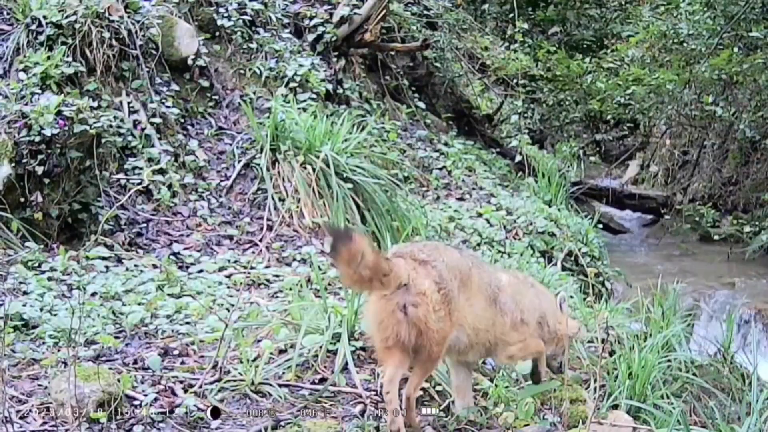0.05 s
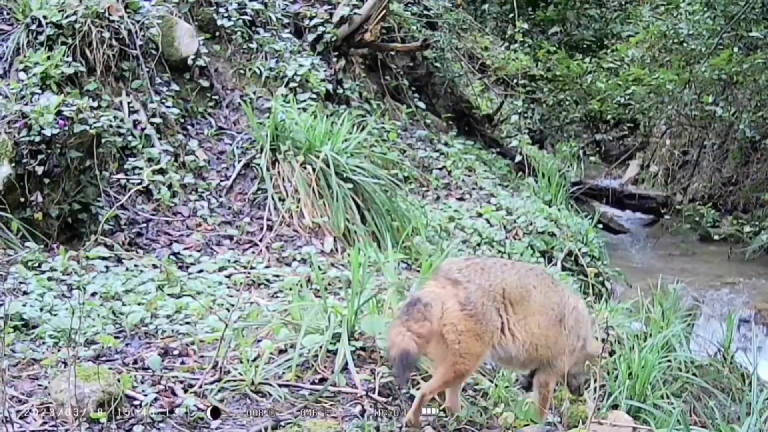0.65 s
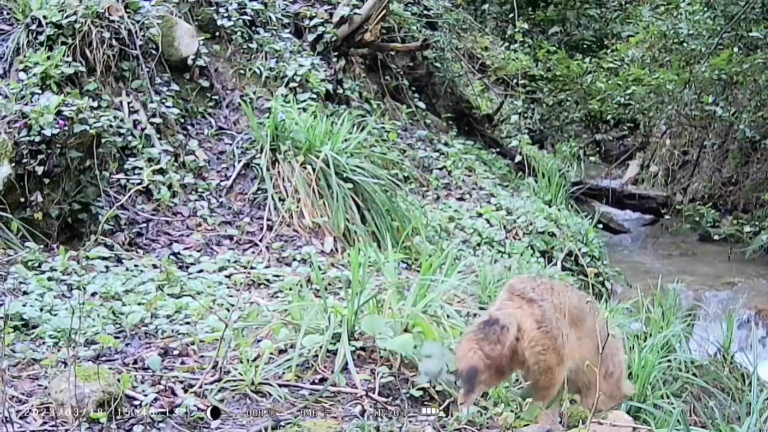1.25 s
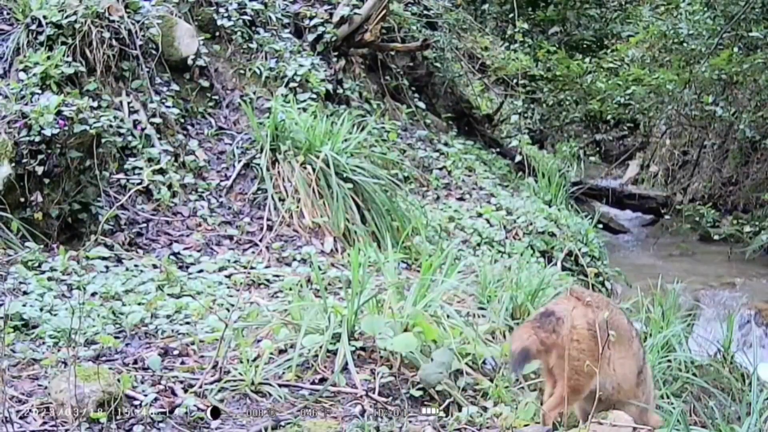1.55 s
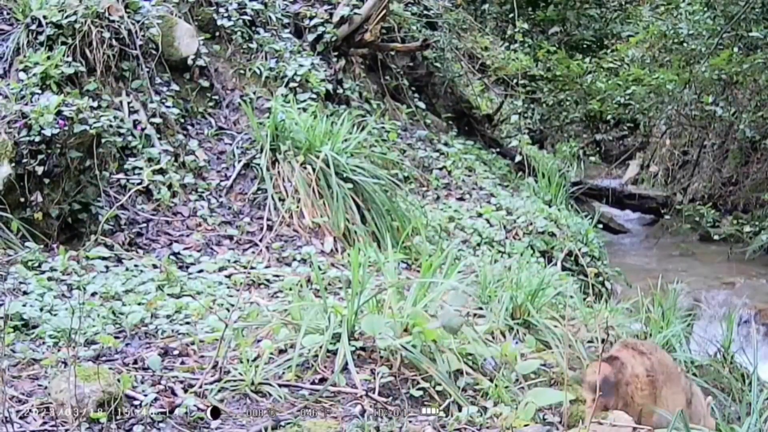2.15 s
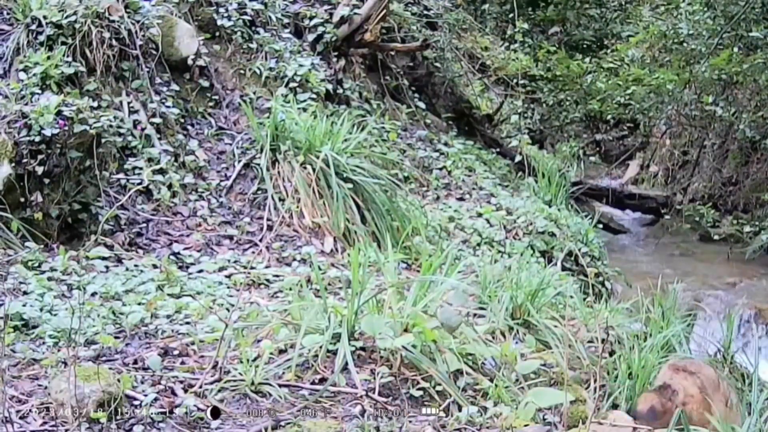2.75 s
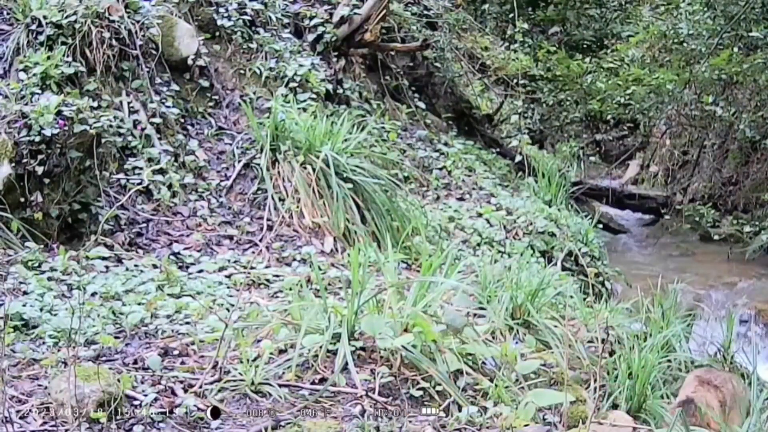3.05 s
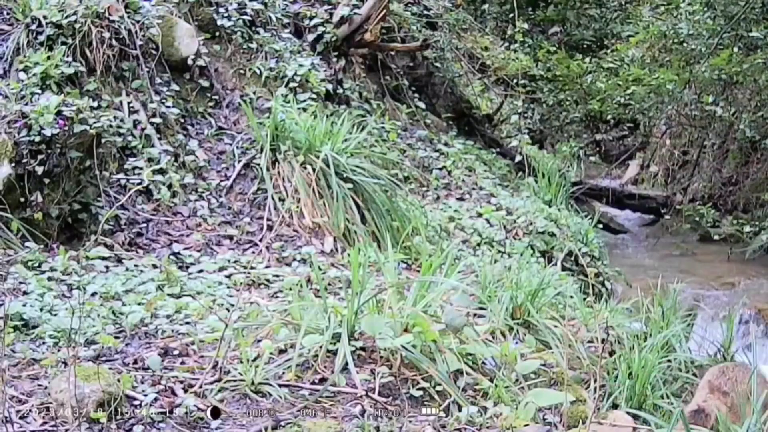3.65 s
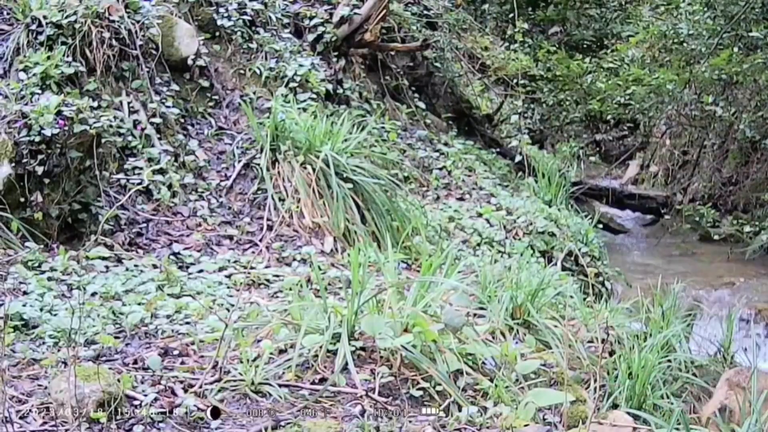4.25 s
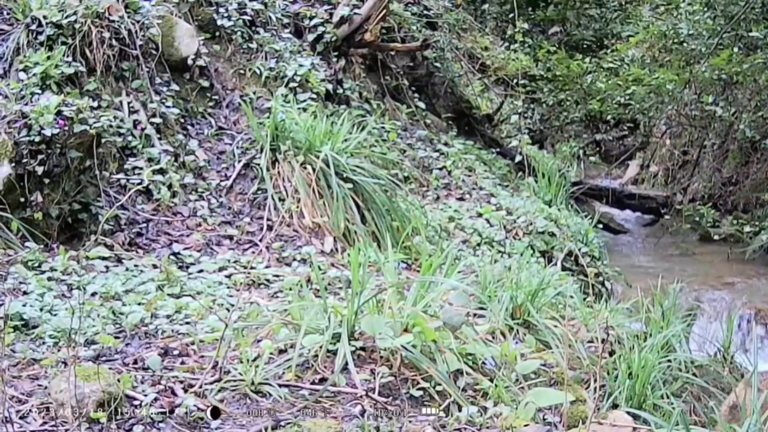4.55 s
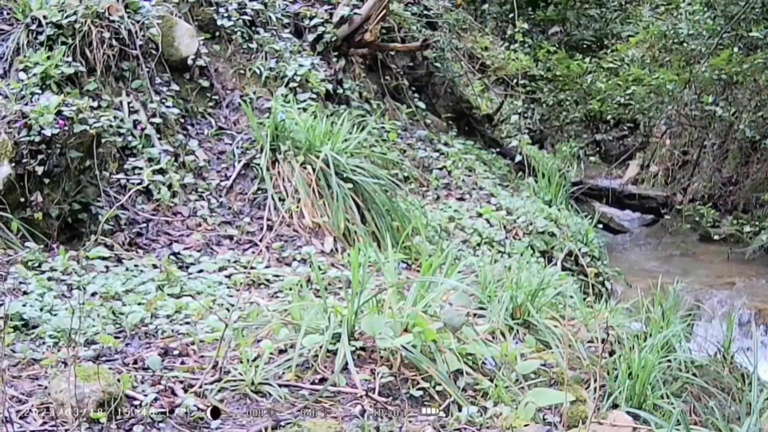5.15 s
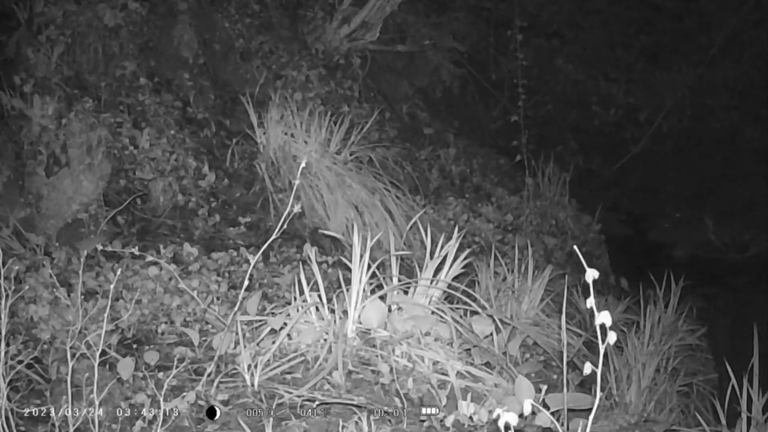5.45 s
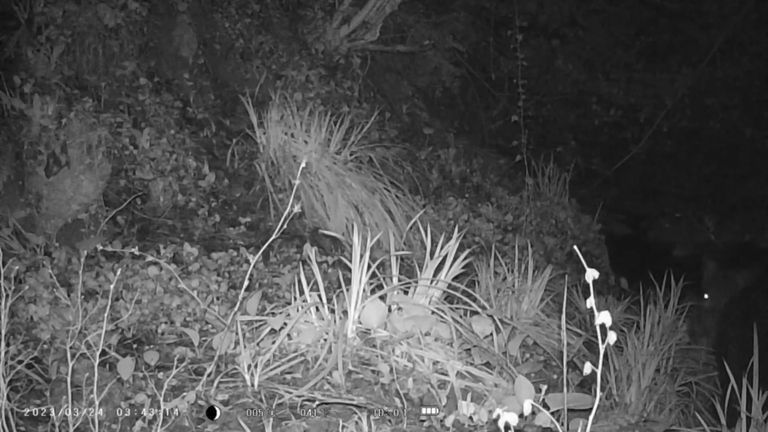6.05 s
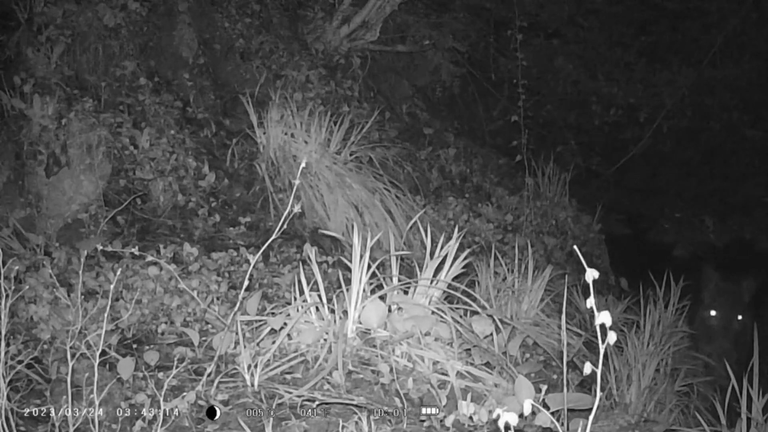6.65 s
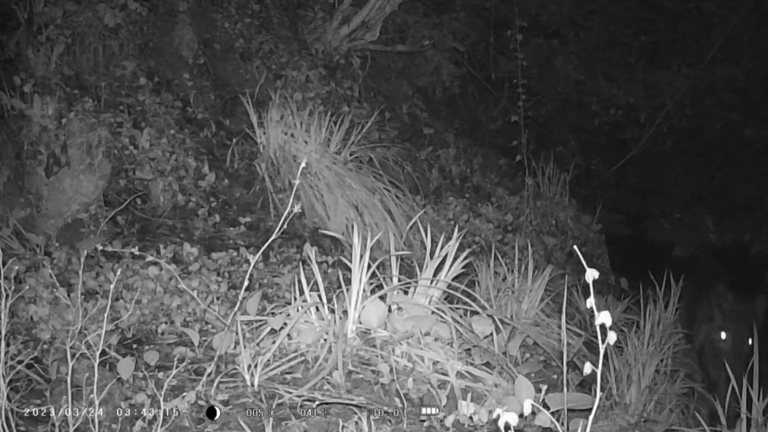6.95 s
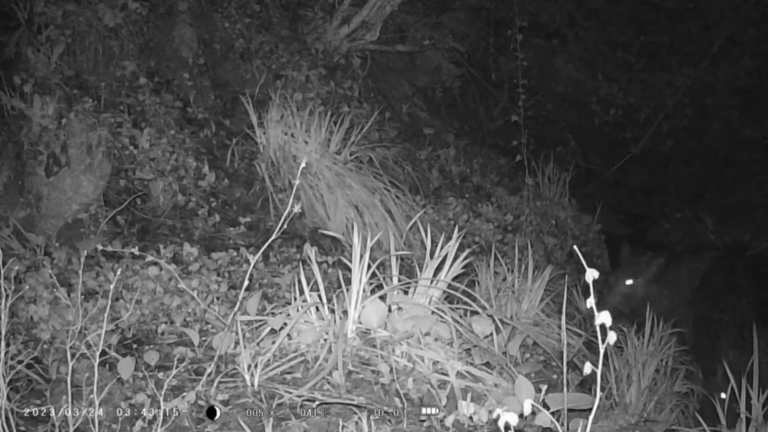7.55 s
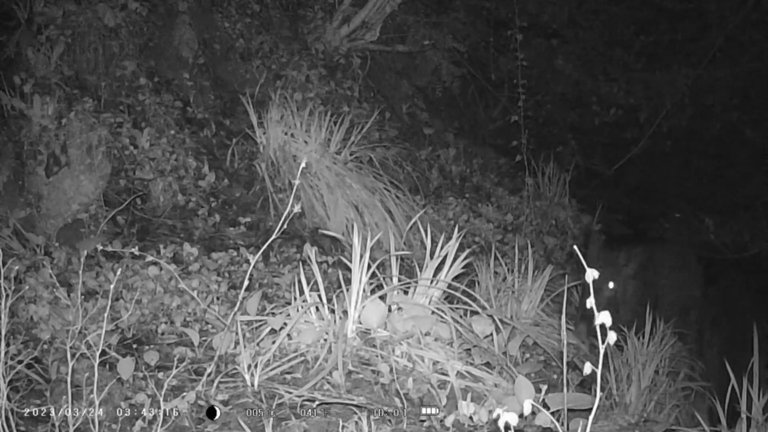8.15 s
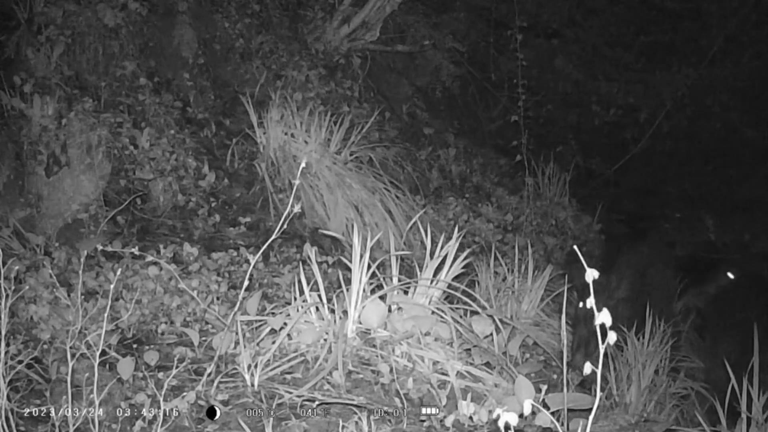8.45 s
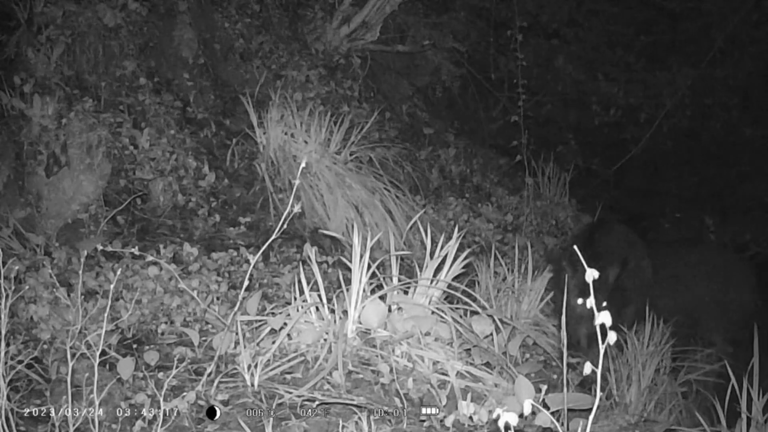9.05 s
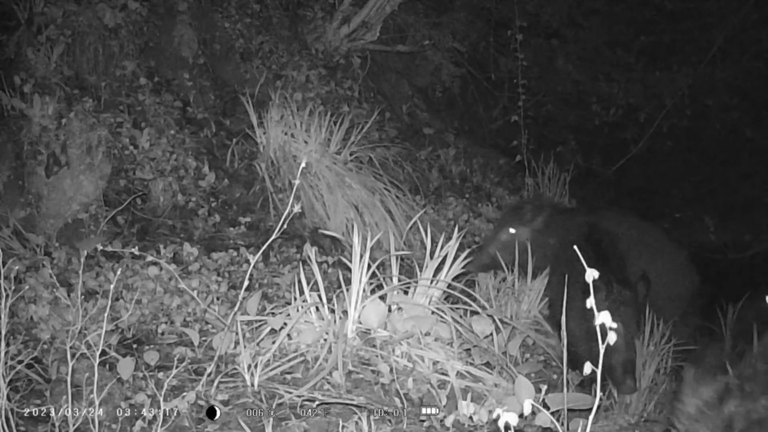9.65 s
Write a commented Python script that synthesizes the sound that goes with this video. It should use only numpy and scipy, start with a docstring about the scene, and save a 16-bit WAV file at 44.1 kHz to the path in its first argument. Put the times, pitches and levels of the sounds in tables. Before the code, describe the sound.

Steady hissing rush of a woodland stream, with one short dropout, then light leaf crackles, twig snaps and two faint low buzzes.

```python
"""A small woodland stream rushes, by day and then, after a short silence, by night.
Countless splashes make its rush, bubbles ring in it and spray fizzes on top.
An animal steps through leaf litter on the bank: leaves crackle under each paw, and dry stalks
and a few twigs snap as their fibres part and set the wood ringing.
A faint low buzz comes twice in the night."""
import sys
import numpy as np
from scipy import signal
from scipy.io import wavfile
from scipy.ndimage import uniform_filter1d

SR = 44100
rng = np.random.default_rng(int(sys.argv[2]) if len(sys.argv) > 2 else 0)


def file_out(sig):
    """Save sig as 16-bit WAV at sys.argv[1]."""
    # one column per channel
    cols = np.atleast_2d(sig).T
    # limit, then scale
    lim = np.clip(cols, -1, 1)
    pcm = np.round(lim * 32767).astype(np.int16)
    wavfile.write(sys.argv[1], SR, pcm)


N = 431738

# Rush spectrum: f/Hz, relative density/dB
RUSH_SPECTRUM = [(25, 0.5), (112, -6.5), (148, 4), (215, 0), (400, -2.5), (530, -9.5), (690, -2), (970, -6),
                 (1200, -9.5), (1850, -8), (2800, -12), (3900, -11)]
# Spray spectrum: f/Hz, relative density/dB
FIZZ_SPECTRUM = [(2900, -27), (3150, -6.5), (3900, -5), (4700, -2), (5900, 1), (6800, -1), (7500, -5),
                 (7800, -9.5), (8300, -15.5), (8900, -30)]
# Water levels: t/s, rush/dB, fizz/dB, rush midrange gain/dB
WATER_LEVELS = [(0, -40.5, -44.5, -0.5), (5.15, -40.5, -45.5, -1), (5.23, -41.5, -47.5, -1.5),
                (9.79, -42, -47.5, -1)]
def stream(rush_top_hz=4300, fizz_bottom_hz=2900):
    """The rush of a small fall, its bubbles and the fizz of its spray."""
    def rush_shape_db(hz):
        return at_hz(RUSH_SPECTRUM, hz) - 10 * np.log10(1 + (hz / rush_top_hz) ** 16)

    def fizz_shape_db(hz):
        octaves_below = np.maximum(np.log2(fizz_bottom_hz / (hz + 1)), 0)
        return at_hz(FIZZ_SPECTRUM, hz) - 24 * octaves_below

    rush_db, fizz_db, mid_db = per_sample(WATER_LEVELS)
    rush = water_noise(rush_shape_db, patch_db=1.09, flicker_db=.48)
    rush += (gain_of(mid_db) - 1) * band(rush, 230, 580, order=1)
    gurgle = woodland_echo(bubbles(), wet_db=-4, t60_s=.2)
    fizz = water_noise(fizz_shape_db, patch_db=2, flicker_db=.9)
    return gain_of(rush_db) * (rush + gain_of(-15.5) * gurgle) + gain_of(fizz_db) * fizz


# The hiss is wide above 4 kHz: f/Hz, left-right correlation
HISS_CORRELATION = [(4100, 1), (4280, 0.72), (8200, 0.18), (8450, 0.91)]
def water_noise(shape_db, patch_db, flicker_db):
    """Countless small splashes: noise in drifting patches, with a flicker shared by all pitches."""
    frames, hz = N // 256 + 5, np.fft.rfftfreq(1024, 1 / SR)
    a, b, c, d, patches = rng.standard_normal((5, frames, len(hz)))
    patches = uniform_filter1d(patches, size=9, axis=0)
    patches = unit_rms(uniform_filter1d(patches, size=10, axis=1))
    flicker = unit_rms(uniform_filter1d(rng.standard_normal(frames), size=7))[:, None]
    correlation = at_hz(HISS_CORRELATION, hz)
    left = a + 1j * b
    right = correlation * left + np.sqrt(1 - correlation ** 2) * (c + 1j * d)
    spectra = np.array([left, right]) * gain_of(shape_db(hz) + patch_db * patches + flicker_db * flicker)
    _, noise = signal.istft(spectra.transpose(0, 2, 1), nperseg=1024, noverlap=768)
    return unit_rms(noise[:, :N])


def bubbles(per_s=300, lo_hz=746.6, hi_hz=3840, decay_cycles=6.2, spread_db=4.5, sizes=36):
    """Each bubble rings for a few cycles and rises in pitch as it nears the surface."""
    out = np.zeros(N)
    for hz in np.geomspace(lo_hz, hi_hz, sizes):
        age = np.arange(0, 5, hz / (decay_cycles * SR))  # in decay times
        phase = 2 * np.pi * decay_cycles * age * (1 + .02 * age)
        ring = np.sin(phase) * np.exp(-age) * (1 - np.exp(-8 * age))
        onset, chance = rng.random((2, int(per_s * N / SR / sizes)))
        level_db = spread_db * np.minimum(-np.log(1 - chance), 4)
        births = np.bincount((onset * N).astype(int), gain_of(level_db), N)
        out += signal.oaconvolve(births, ring)[:N]
    return unit_rms(out)


# Paw steps: t/s at full weight, length/s, level/dB
PAW_STEPS = [(.578, 0.093, -49), (2.009, 0.072, -49), (2.08, .1, -50.5), (5.5, 0.25, -49.5),
             (6.375, 0.073, -50.5), (6.608, 0.44, -46.5), (6.772, .12, -50), (6.902, .12, -51),
             (7.417, .14, -50), (7.598, 0.18, -46.5), (8.075, 0.11, -45.5), (8.322, .1, -48),
             (8.666, 0.066, -42), (8.802, .06, -46), (8.9, .1, -45.5), (9.095, .07, -47), (9.191, .17, -50),
             (9.439, .14, -54)]
def leaves(cracks_per_s=2000, spread_db=3, rustle_db=-63, press_share=.53, step_edge_db=-9.5):
    """Dead leaves give way in tiny cracks, swelling as each paw presses down and fading as it lifts."""
    t = np.arange(N) / SR
    power = np.full(N, gain_of(rustle_db) ** 2)
    for peak_s, length_s, db in PAW_STEPS:
        from_peak = np.maximum((peak_s - t) / press_share, (t - peak_s) / (1 - press_share)) / length_s
        power += gain_of(db + step_edge_db * np.minimum(from_peak, 10)) ** 2
    cracks = rng.choice([-1, 1], N) * gain_of(spread_db * np.minimum(rng.exponential(1, N), 4))
    cracks *= rng.random(N) < cracks_per_s / SR
    crackle = unit_rms(band(cracks, 4850, 7150, order=3)) * np.sqrt(power)
    stereo = np.array([woodland_echo(crackle, wet_db=-12.5, t60_s=.12) for ear in range(2)])
    return band(stereo, 3600, 12000, order=8)


# Dry wood modes at pitch factor 1: f/Hz, relative level/dB, t60/s
WOOD_MODES = [(2270, 7.5, 0.0072), (4380, 2.5, .011), (5140, 1, .007), (5950, 3, 0.013), (6650, -5, 0.0068)]
def wood_snap(pitch, tear_s, bass_edge_hz, ring_db=-23, first_fibre_db=8):
    """Fibres part in a quick run of cracks that rings the wood; thin wood radiates little bass."""
    t = np.arange(2048) / SR
    response = gain_of(ring_db) * sum(
        gain_of(db - 60 * t / t60_s) * np.cos(2 * np.pi * hz * pitch * t) for hz, db, t60_s in WOOD_MODES)
    response[0] += 1  # the crack itself
    fibres = rng.choice([-1, 1], len(t)) * (rng.random(len(t)) < .25) * np.exp(-(t / tear_s) ** 2)
    fibres[0] = gain_of(first_fibre_db)
    snap = band(signal.fftconvolve(fibres, response)[:len(t)], bass_edge_hz, 11000, order=1)
    snap = band(snap, 1550, 7700 * pitch ** .15, order=6)
    tear_rms = np.sqrt(np.sum(snap ** 2) / (tear_s * SR))
    return snap / tear_rms


# Twig breaks: t/s, level/dB, pitch factor, tear length/s
TWIG_SNAPS = [(6.443, -24, 1.3, .0019), (8.3242, -26.5, 1.23, 0.0025), (9.017, -24, 0.94, .00086),
              (9.0311, -16, 1, 0.0029), (9.278, -28, 1, 0.0019), (9.7137, -30.5, .8, 0.0014)]
def twigs_and_stalks(stalk_over_leaves_db=6.5):
    """A few twigs break, the thin ones ringing higher; each step breaks a stalk at full weight."""
    out = np.zeros(N)
    for start_s, db, pitch, tear_s in TWIG_SNAPS:
        add(out, start_s, gain_of(db) * wood_snap(pitch, tear_s, bass_edge_hz=3750))
    for peak_s, _, db in PAW_STEPS:
        stalk = wood_snap(pitch=.92, tear_s=.0046, bass_edge_hz=5300)
        add(out, peak_s, gain_of(db + stalk_over_leaves_db) * stalk)
    return woodland_echo(out, wet_db=-9.5, t60_s=.081)


# Buzzes: start/s, end/s, level/dB, pulse rate/Hz
NIGHT_BUZZES = [(7.501, 7.923, -44.5, 31.8), (9.049, 9.44, -43.5, 31.5)]
# Buzz harmonics from the second up: relative level/dB
BUZZ_HARMONICS_DB = [-1.5, -1.5, -15, -9, -5.5, -11]
def buzz():
    """A slow train of soft, low pulses that swells and fades."""
    out = np.zeros(N)
    for start_s, end_s, db, pulse_hz in NIGHT_BUZZES:
        t = np.arange(0, end_s - start_s, 1 / SR)
        pulses = sum(gain_of(harmonic_db) * np.cos(2 * np.pi * k * pulse_hz * t)
                     for k, harmonic_db in enumerate(BUZZ_HARMONICS_DB, 2))
        add(out, start_s, gain_of(db) * unit_rms(pulses) * signal.windows.tukey(len(t), .5))
    return out


def woodland_echo(x, wet_db, t60_s):
    """Trunks and the bank scatter a short, thin echo."""
    t = np.arange(SR // 3) / SR
    taps = rng.standard_normal(len(t)) * (rng.random(len(t)) < .08)
    taps *= gain_of(-60 * t / t60_s) * (t > .002)
    return x + gain_of(wet_db) * signal.oaconvolve(x, taps / np.linalg.norm(taps))[:N]


def gain_of(db):
    """Decibels to amplitude."""
    return 10 ** (np.asarray(db) / 20)


def unit_rms(x):
    """Scales to rms 1."""
    return x / np.sqrt(np.mean(x ** 2) + 1e-20)


def at_hz(table, hz):
    """Interpolates a table over log frequency."""
    knots_hz, values = np.transpose(table)
    return np.interp(np.log(hz + 1), np.log(knots_hz + 1), values)


def per_sample(table):
    """Interpolates each column over time."""
    knots_s, *columns = np.transpose(table)
    return [np.interp(np.arange(N) / SR, knots_s, column) for column in columns]


def add(mix, start_s, sound):
    """Mixes a sound in at start_s."""
    part = mix[round(start_s * SR):][:len(sound)]
    part += sound[:len(part)]


def band(x, lo_hz, hi_hz, order):
    """Butterworth band-pass."""
    return signal.sosfilt(signal.butter(order, [lo_hz, hi_hz], "band", fs=SR, output="sos"), x)


def scene():
    """The stream, the animal on its bank and the buzz."""
    return stream() + leaves() + twigs_and_stalks() + buzz()


def record(dry, day_end_s=5.15, night_start_s=5.23, dc_offset=.0328, cutoff_hz=8850):
    """Gate and low-pass; a steady offset makes the silence before night begin and end with a soft pop."""
    t = np.arange(N) / SR
    gate = (t < day_end_s) | (t > night_start_s)
    lowpass = signal.firwin(255, cutoff_hz, window=("kaiser", 8), fs=SR)
    margin = len(lowpass) // 2
    padded = np.pad((dry + dc_offset) * gate, ((0, 0), (margin, margin)), "edge")
    return signal.oaconvolve(padded, lowpass[None], "valid", axes=1)


dry = scene()
out = record(dry)
file_out(out)
```